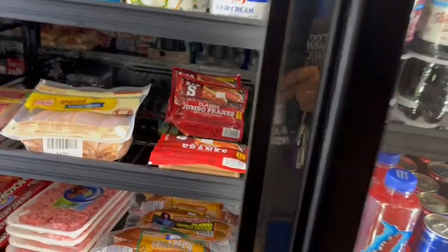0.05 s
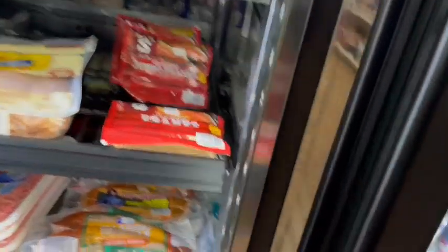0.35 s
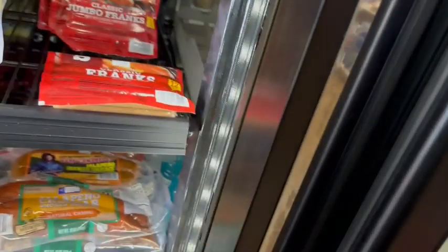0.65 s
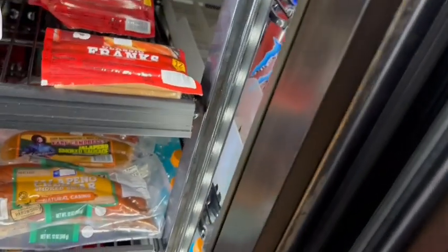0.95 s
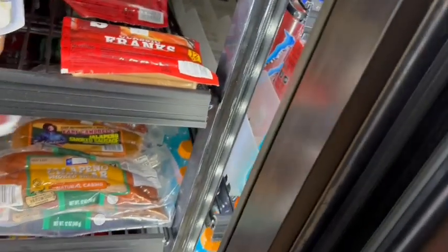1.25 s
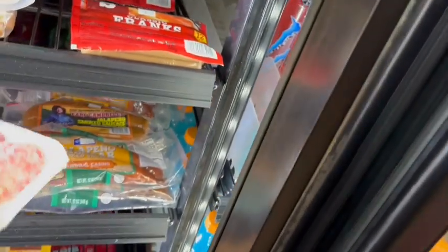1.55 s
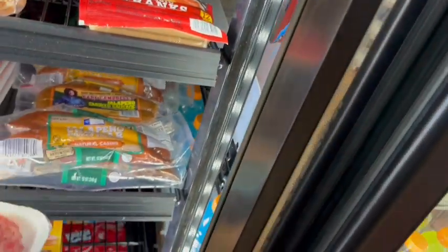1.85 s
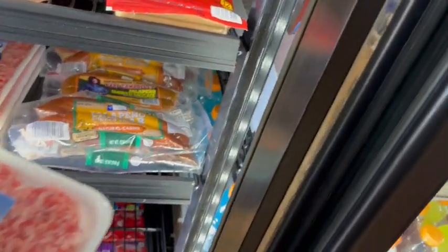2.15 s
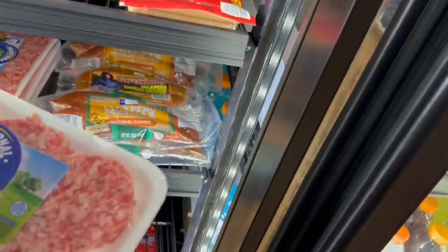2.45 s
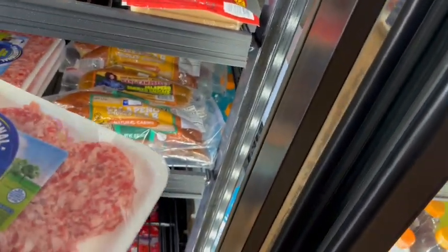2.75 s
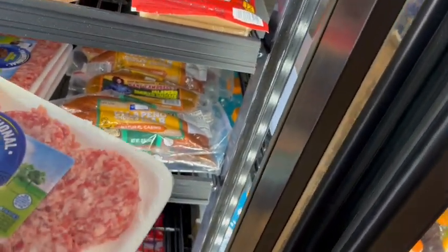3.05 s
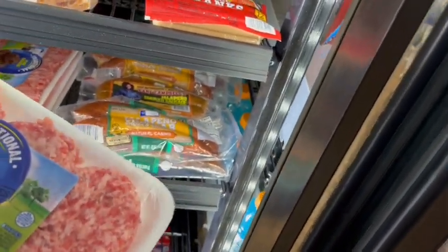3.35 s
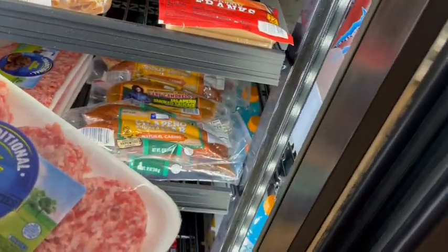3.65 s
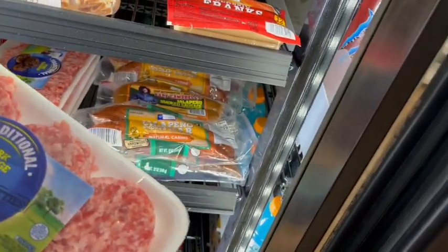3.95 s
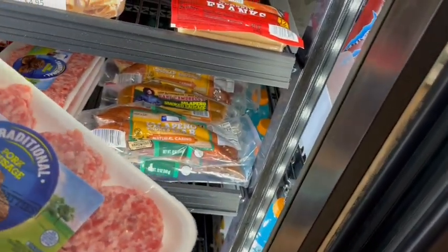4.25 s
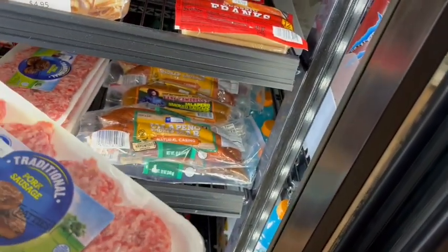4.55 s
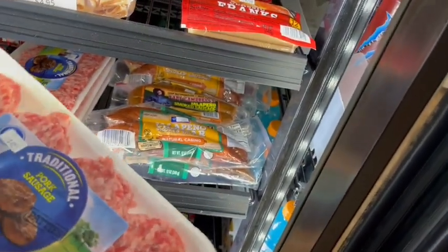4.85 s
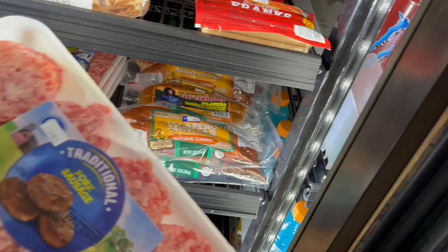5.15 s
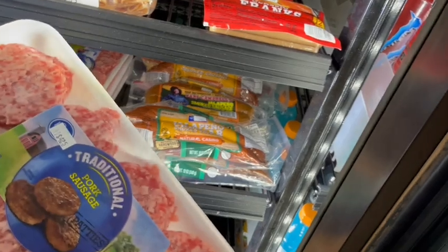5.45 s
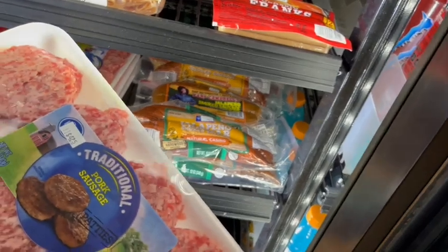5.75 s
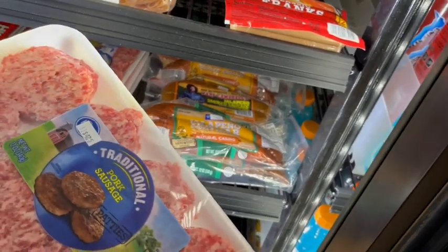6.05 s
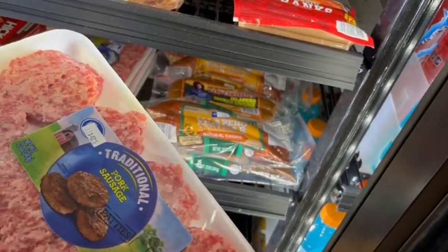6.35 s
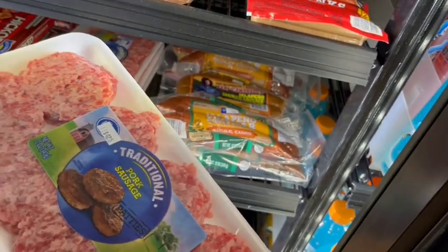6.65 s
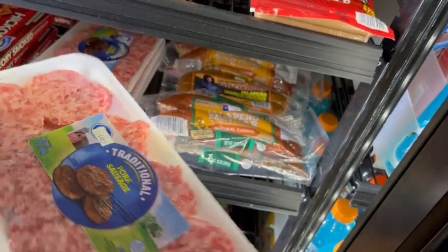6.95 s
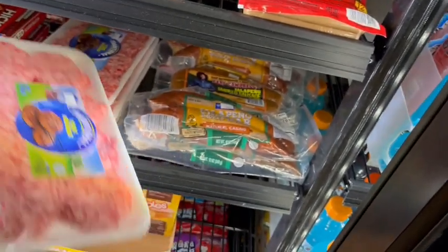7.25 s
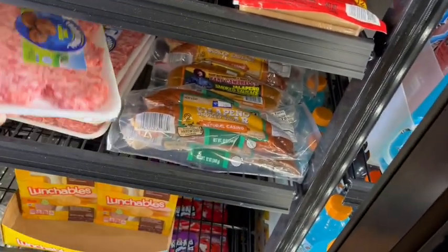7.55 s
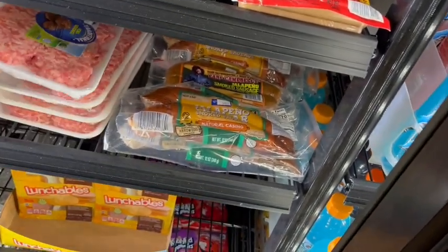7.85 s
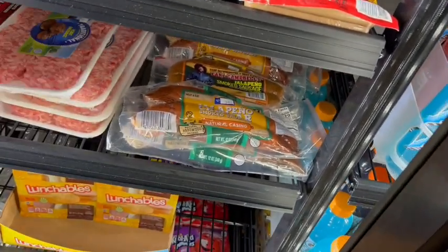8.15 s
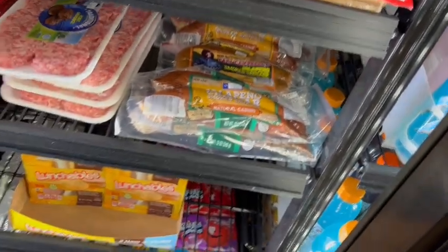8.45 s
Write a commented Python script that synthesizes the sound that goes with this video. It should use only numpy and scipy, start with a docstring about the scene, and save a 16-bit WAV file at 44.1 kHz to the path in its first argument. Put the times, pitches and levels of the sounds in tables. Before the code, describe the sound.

A low fan drone swells and fades unevenly over a motor hum and moving air, heard close up at an open shop cooler. Early on come small snaps and squeaks of plastic wrap, dull knocks and a faint whistle of air. Two quick hollow taps on a foam tray follow. The microphone moves in among the shelves, and the tray is returned with a few more soft crinkles and bumps.

```python
"""An open refrigerated display case in a shop. Throughout, air rushes through ducts and shelves,
evaporator fans drone in swells and a motor hums on a mains harmonic. In the first 2 s air whistles
faintly at the door frame and a film-wrapped tray is lifted off its stack with crinkles and soft bumps.
From 1.3 to 6 s the microphone leans in between the shelves; near 2.5 s the foam tray taps twice.
From about 7 s the film crinkles again as the tray is put back."""
import sys
import numpy as np
from scipy.fft import rfft, irfft, next_fast_len
from scipy.io import wavfile
from scipy.ndimage import uniform_filter1d, map_coordinates

SR = 44100
rng = np.random.default_rng(int(sys.argv[2]) if len(sys.argv) > 2 else 0)


def persist_wave(psi):
    """Save psi, clipped to +-1, as 16-bit WAV."""
    counts = np.round(np.clip(psi, -1, 1) * 32767).astype(np.int16)
    wavfile.write(sys.argv[1], SR, np.atleast_2d(counts).T)


N = 379701

# Microphone path. Each row: time in seconds, reach from 0 (door) to 1 (between the shelves).
MIC_REACH = [(0, 0.025), (1.3, 0.015), (2.2, 0.4), (3.2, 0.53), (4.2, 0.92), (6, 1), (7.5, 0.87),
             (8.6, 0.87)]


def amp(db):
    """Decibels to gain."""
    return 10 ** (np.asarray(db) / 20)


def unit(x):
    """Scale to rms 1."""
    return x / np.sqrt(np.mean(np.abs(x) ** 2) + 1e-20)


def along(points, hz):
    """Interpolate (Hz, value) points on a log frequency axis."""
    knots_hz, values = np.transpose(points)
    return np.interp(np.log(hz + 1), np.log(knots_hz + 1), values)


def clock():
    """Sample times in seconds."""
    return np.arange(N) / SR


def curves(rows):
    """One value per sample for each column after the time."""
    times_s, *columns = np.transpose(rows)
    return [np.interp(clock(), times_s, column) for column in columns]


def wobble(knots_per_s):
    """Smooth random curve."""
    knots = rng.standard_normal(int(N * knots_per_s / SR) + 4)
    return map_coordinates(knots, [clock() * knots_per_s])


def filtered(x, response):
    """Apply a frequency response, given as a function of Hz."""
    size = next_fast_len(N + SR // 2)
    return irfft(rfft(x, size) * response(np.fft.rfftfreq(size, 1 / SR)), size)[..., :N]


def resonance(hz, centre_hz, width_hz):
    """Causal resonance, peak gain 1."""
    return 1j * hz * width_hz / (centre_hz ** 2 - hz ** 2 + 1j * hz * width_hz)


def steady(x, span_s=0.14):
    """Even out the slow swells of a noise, keeping its rms."""
    power = np.abs(uniform_filter1d(np.mean(x ** 2, axis=0), int(span_s * SR)))
    return x * np.sqrt(np.mean(power) / (power + 1e-12))


def ports(tilt_db, lead_rad):
    """Complex gains of the left and right microphone ports, mean power 1."""
    gains = np.array([amp(tilt_db / 2), amp(-tilt_db / 2)])
    return gains / np.sqrt(np.mean(gains ** 2, axis=0)) * np.exp(.5j * np.array([lead_rad, -lead_rad]))


def air(colour):
    """Turbulent noise of amplitude density colour(hz), partly alike at the two ports."""
    # Each row: frequency in Hz, left-right likeness from 0 to 1.
    likeness = [(40, .87), (120, .66), (400, .78), (560, .6), (650, .35), (900, .5), (1150, .06),
                (1620, .2), (1760, .8), (2700, .6), (5000, .48), (7000, .68), (8500, .85), (12000, .85)]
    # Each row: frequency in Hz, left minus right level in dB.
    tilt_db = [(60, 0), (190, -0.5), (250, 2.5), (450, 0), (600, 4.5), (690, 8.5), (850, 2.5), (1400, -0.5),
               (2000, 3.5), (2700, 2), (4400, 6.5), (7500, 0)]
    # Each row: frequency in Hz, phase lead of the left port in radians.
    lead_rad = [(80, .05), (170, .3), (550, .55), (690, .9), (800, 2.5), (950, 2.6), (1150, .6), (1400, .6),
                (1570, 1.6), (1720, .5), (2000, .4), (3300, 1), (4900, .2), (6000, -1.1), (7000, -1.7),
                (8300, -3.1), (10000, -4.9), (14500, -8)]
    size = next_fast_len(N + SR // 2)
    hz = np.fft.rfftfreq(size, 1 / SR)
    shared, apart = rfft(rng.standard_normal((2, size))) * np.sqrt(SR / 2)
    mix_rad = np.arccos(np.clip(along(likeness, hz), 0, 1)) / 2
    pair = np.cos(mix_rad) * shared + np.outer([1, -1], np.sin(mix_rad) * apart)
    return irfft(pair * colour(hz) * ports(along(tilt_db, hz), along(lead_rad, hz)), size)[:, :N]


def tone(phase, waver, knots_per_s, tilt_db, lead_rad):
    """Stereo tone of rms 1; the share waver flutters in strength and phase."""
    share = np.clip(waver, 0, 1)
    flutter = unit(wobble(knots_per_s) + 1j * wobble(knots_per_s))
    line = (np.sqrt(1 - share ** 2) + share * flutter) * np.exp(1j * phase)
    return np.sqrt(2) * np.real(np.outer(ports(tilt_db, lead_rad), line))


def airflow(rumble_gain_db=-2.5, surge_db=2.5):
    """The air curtain rumbles in random surges, the ducts roar, the grille hisses."""
    # Three air spectra. Each row: frequency in Hz, relative density in dB.
    curtain_db = [(8, -65), (20, -60), (30, -63), (42, -50.5), (60, -44.5), (100, -44.5), (150, -49),
                  (230, -70), (500, -110)]
    duct_db = [(50, -75), (110, -49.5), (160, -44.5), (200, -49), (265, -48.5), (290, -55.5), (390, -53.5),
               (490, -57), (595, -63), (800, -67), (1000, -74), (2000, -100), (5000, -120)]
    grille_db = [(300, -90), (850, -71), (1100, -70.3), (1600, -71), (2000, -75.7), (2700, -77.5),
                 (3300, -80), (4000, -82.4), (5000, -87.4), (7000, -93), (8300, -96.5), (10000, -96),
                 (12000, -99), (14500, -105)]
    surge = amp(rumble_gain_db + surge_db * wobble(11))
    rumble = surge * steady(air(lambda hz: amp(along(curtain_db, hz))))
    roar = amp(0.57 * wobble(8.7)) * air(lambda hz: amp(along(duct_db, hz)))
    hiss = amp(0.36 * wobble(12)) * air(lambda hz: amp(along(grille_db, hz)))
    return rumble + roar + hiss


def cabinet():
    """Air stirs standing waves between the shelves; their balance follows the microphone's reach."""
    # Each row: centre in Hz, width per filter stage in Hz, peak density in dB at the door, then inside.
    modes = [(136.7, 23, -49, -48), (218.7, 9.1, -57, -47.5), (247, 19, -54.5, -49), (307, 13, -53, -52.5),
             (389, 9.7, -63, -51), (419, 22.5, -52, -52.5), (556, 30, -55.5, -55), (649, 47, -63, -63.5),
             (690.7, 45, -59, -57), (849, 54, -66.5, -78), (1074, 86, -69.5, -66.5),
             (1362, 164, -81, -67.5), (1580, 235, -76, -69.5), (1730, 49, -78, -73.5), (2140, 62, -82, -74),
             (2695, 66, -82.5, -77.5)]
    centres_hz, widths_hz, door_db, inside_db = np.transpose(modes)

    def stirred(peaks_db):
        """Noise through all modes, two stages each."""
        return air(lambda hz: np.sqrt(sum(
            amp(db) ** 2 * np.abs(resonance(hz, centre_hz, width_hz)) ** 4
            for centre_hz, width_hz, db in zip(centres_hz, widths_hz, peaks_db))))

    reach = np.clip(curves(MIC_REACH)[0], 0, 1)
    return np.sqrt(1 - reach) * stirred(door_db) + np.sqrt(reach) * stirred(inside_db)


def whistle(split_hz=58):
    """Air at the door frame: two close, fluttering edge tones that wander in pitch together."""
    # Each row: time in seconds, level in dB, centre pitch in Hz.
    contour = [(0, -66, 1760), (.45, -62, 1750), (.65, -56, 1680), (.8, -52, 1735), (.92, -57, 1735),
               (1.2, -50, 1740), (1.6, -57, 1740), (1.72, -60, 1750), (1.81, -52, 1780), (1.9, -66, 1770),
               (3, -80, 1750)]
    level_db, pitch_hz = curves(contour)
    pair = sum(tone(2 * np.pi * np.cumsum(hz) / SR, waver=0.7, knots_per_s=28, tilt_db=6, lead_rad=.4)
               for hz in (pitch_hz - split_hz / 2, pitch_hz + split_hz / 2))
    return amp(level_db) * unit(pair)


def fans(blade_hz=137.7, octave_db=-38):
    """The fan drone swells and fades unevenly, about once a second; overtones flutter."""
    # Blade tone. Each row: time in seconds, level in dB.
    swells = [(0, -30), (.6, -25), (.95, -20), (1.35, -29), (1.5, -23), (1.68, -26), (1.8, -19.5),
              (1.94, -20), (2.02, -35), (2.15, -26), (2.5, -24), (2.72, -32), (3.13, -20), (3.27, -29),
              (3.95, -24), (4.15, -19.5), (4.69, -27), (4.78, -22), (4.95, -19), (5.22, -25), (5.35, -20),
              (5.6, -19.5), (5.68, -31), (5.78, -22), (6.08, -19), (6.22, -26), (6.32, -19.5), (6.77, -33),
              (6.9, -19), (7.35, -22), (7.55, -28), (7.76, -21.5), (7.95, -29), (8.17, -24), (8.26, -16.5),
              (8.38, -27), (8.53, -19.5), (8.61, -27)]
    # Third harmonic, dipping as the microphone passes the door. Each row: time in seconds, level in dB.
    third_levels = [(0, -36), (1.35, -38), (1.7, -51), (3.5, -48), (4.5, -43.5), (7.3, -40.5), (8.6, -49)]
    drone_db, = curves(swells)
    third_db, = curves(third_levels)
    phase = 2 * np.pi * blade_hz * clock()
    drone = amp(drone_db) * tone(phase, waver=0.17, knots_per_s=12, tilt_db=1.5, lead_rad=0.51)
    octave = amp(octave_db) * tone(2 * phase, waver=0.81, knots_per_s=9, tilt_db=4, lead_rad=0.45)
    third = amp(third_db) * tone(3 * phase, waver=0.77, knots_per_s=10, tilt_db=5.5, lead_rad=.4)
    return drone + octave + third


def motor(hum_hz=359.8, level_db=-31.5, door_waver=.45, inside_waver=.28):
    """Electric hum on a mains harmonic; wavers at the door, steadier between the shelves."""
    waver = np.interp(curves(MIC_REACH)[0], [0, 1], [door_waver, inside_waver])
    phase = 2 * np.pi * hum_hz * clock()
    return amp(level_db) * tone(phase, waver, knots_per_s=12, tilt_db=7, lead_rad=0.19)


def bumps(push_gain_db=-1, thud_gain_db=-8, push_width_share=0.57):
    """Soft hand knocks: a few low cycles, alike at both ports, inside a dull noise thud."""
    # Each row: peak time in seconds, relative level in dB, pitch in Hz, half-width in seconds,
    # pitch fall in octaves per second (negative rises).
    knocks = [(.17, -18.5, 75, .025, 0), (.295, -11.5, 100, .055, 19), (0.43, -14, 140, 0.027, -3),
              (0.473, -12.5, 68, 0.04, 4), (0.653, -14.5, 91, 0.033, -4), (1.169, -16, 62, 0.062, 0),
              (1.316, -14.5, 60, .032, 3), (1.591, -14, 62, .022, 0), (1.928, -17, 60, 0.045, 11),
              (2.428, -15.5, 110, .025, -2), (2.613, -15, 112, 0.038, 3), (2.803, -15, 130, .025, 0),
              (2.847, -9, 84, 0.038, 23), (3.638, -19, 55, 0.029, 0), (4.19, -11, 145, 0.018, 2),
              (4.88, -18, 55, 0.12, 1), (6.089, -12, 101, 0.023, 0), (6.252, -14.5, 80, 0.036, 2),
              (7.116, -16.5, 85, .04, 18), (7.295, -17, 75, .025, 15), (7.518, -14.5, 69.4, 0.064, 4),
              (8.29, -18, 90, .025, 0)]
    # Thud spectrum. Each row: frequency in Hz, relative density in dB.
    thud_db = [(20, -15), (40, -4.5), (80, 0.5), (150, 0), (210, -5), (300, -22.5), (600, -70),
               (2000, -120)]
    t = clock()
    push, thud_envelope = np.zeros(N), np.zeros(N)
    for peak_s, db, hz, half_width_s, fall_oct_per_s in knocks:
        near = np.abs(t - peak_s) < 4 * half_width_s
        age_s = t[near] - peak_s
        cycles = np.cumsum(hz * 2 ** (-fall_oct_per_s * age_s)) / SR
        phase = 2 * np.pi * (np.interp(0, age_s, cycles) - cycles)  # zero at peak_s
        push[near] += amp(db) * np.exp(-(age_s / (push_width_share * half_width_s)) ** 2) * np.sin(phase)
        thud_envelope[near] += amp(db) * np.exp(-(age_s / half_width_s) ** 2)
    thud = thud_envelope * unit(air(lambda hz: amp(along(thud_db, hz))))
    return amp(push_gain_db) * push + amp(thud_gain_db) * thud


def tray(attack_s=.0015):
    """The foam tray's hollow modes ring as the grip shifts."""
    # Each row: frequency in Hz, relative level in dB, t60 in seconds.
    modes = [(255, -14.5, .11), (350, -9.5, .075), (455, -22, .05), (645, -21.5, .07), (765, -28, .05)]
    # Each row: start in seconds, gain in dB.
    taps = [(2.4865, 0), (2.576, -6)]
    out = np.zeros(N)
    for start_s, gain_db in taps:
        age_s = np.maximum(clock() - start_s, 0)
        ring = sum(amp(db - 60 * age_s / t60_s) * np.sin(2 * np.pi * hz * age_s)
                   for hz, db, t60_s in modes)
        out += amp(gain_db) * (1 - np.exp(-age_s / attack_s)) * ring
    return out


def film(snap_width_hz=6000, squeak_width_hz=350, slide_width_hz=15000, slide_attack_s=.016):
    """Stretched wrapping snaps and squeaks; film slides on film in fine grains."""
    # Snaps and squeaks. Each row: start in seconds, level in dB, centre in Hz, t60 in seconds.
    snap_events = [(.5003, -32, 6600, .02), (.507, -42, 8500, .025), (.5155, -39.5, 7200, .028),
                   (.78, -48, 7000, .04), (.9428, -41, 11500, .008), (.9603, -43.5, 11000, .025),
                   (.962, -44, 6000, .035), (.9783, -39.5, 11000, .028), (.98, -44, 7000, .03),
                   (1.165, -47.5, 12000, .03), (1.265, -51, 9500, .05), (1.279, -45.5, 6000, .05),
                   (1.508, -51, 11500, .02), (1.63, -46, 12000, .025), (6.9317, -35.5, 12300, .012),
                   (6.9317, -39, 6000, .014), (7.06, -50, 9000, .012), (7.984, -49, 11000, .025),
                   (8.11, -51, 11000, .025)]
    squeak_events = [(.501, -47.5, 9800, .08), (1.302, -55, 13000, .09), (1.618, -44, 13000, .09),
                     (1.618, -46.5, 12400, 0.065), (1.975, -61, 12400, .15)]
    # Each row: peak time in seconds, level in dB, release in seconds, centre in Hz.
    slide_events = [(.48, -57, .04, 7000), (.53, -45, .11, 2900), (.6, -56.5, .07, 11000),
                    (.665, -59, .04, 11000), (.79, -60, .04, 10000), (.975, -54, .025, 8000),
                    (1.19, -54, .12, 4200), (1.27, -52.5, .06, 7500), (1.51, -58, .09, 11000),
                    (6.933, -55, .012, 7000), (7.1, -63, .4, 10000), (8.08, -61, .1, 11000)]
    white = air(np.ones_like)

    def band(centre_hz, width_hz):
        """Noise through two resonance stages, rms 1."""
        return unit(filtered(white, lambda hz: resonance(hz, centre_hz, width_hz) ** 2))

    def burst(start_s, db, centre_hz, t60_s, width_hz):
        """Sudden onset, exponential decay."""
        age_s = clock() - start_s
        return band(centre_hz, width_hz) * (age_s >= 0) * amp(db - 60 * np.abs(age_s) / t60_s)

    def slide(peak_s, db, release_s, centre_hz):
        """Friction takes hold quickly and eases off."""
        age_s = clock() - peak_s
        envelope = np.exp(-np.maximum(-age_s / slide_attack_s, age_s / release_s))
        return band(centre_hz, slide_width_hz) * amp(db) * envelope

    snaps = sum(burst(*row, snap_width_hz) for row in snap_events)
    squeaks = sum(burst(*row, squeak_width_hz) for row in squeak_events)
    grains = unit(amp(2.2 * wobble(400)))
    return snaps + squeaks + grains * sum(slide(*row) for row in slide_events)


def scene():
    """The running cooler and the handling of the tray."""
    return airflow() + cabinet() + whistle() + fans() + motor() + bumps() + tray() + film()


def record(dry):
    """The phone's band limit: a brick-wall low-pass."""
    top_hz = 14500
    return filtered(dry, lambda hz: hz < top_hz)


dry = scene()
out = record(dry)
persist_wave(out)
```